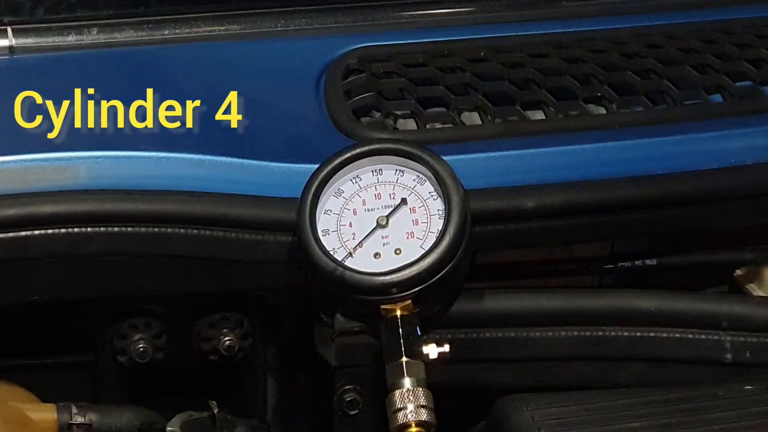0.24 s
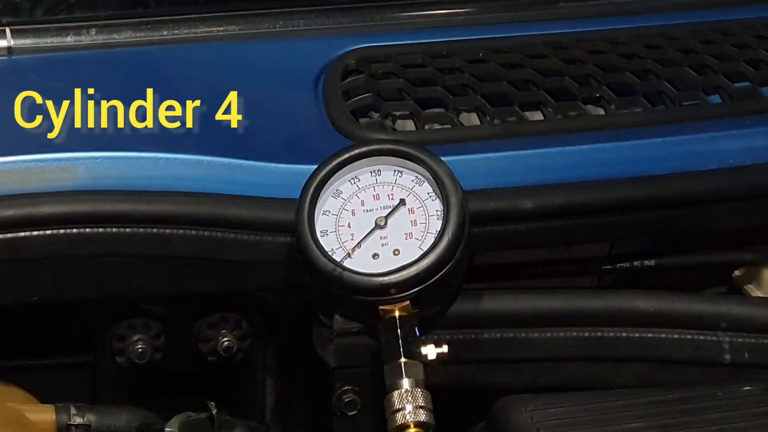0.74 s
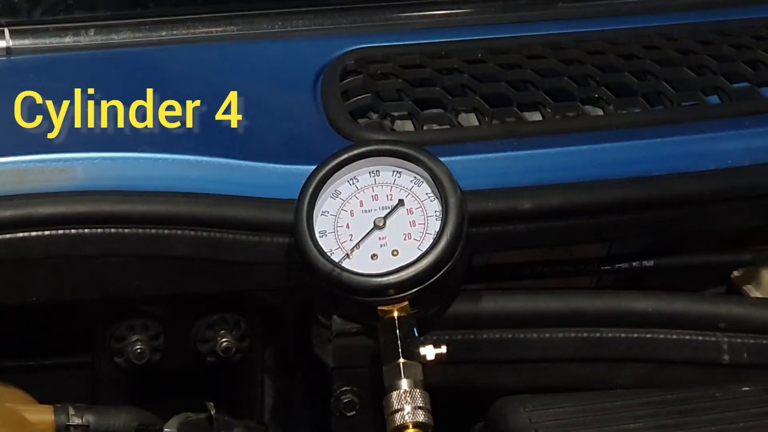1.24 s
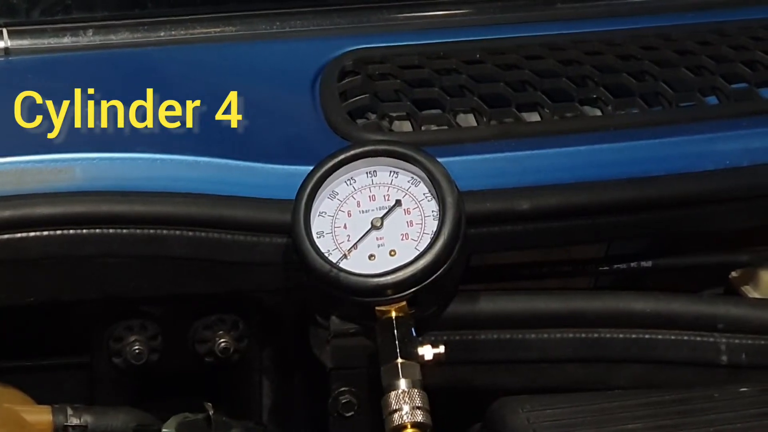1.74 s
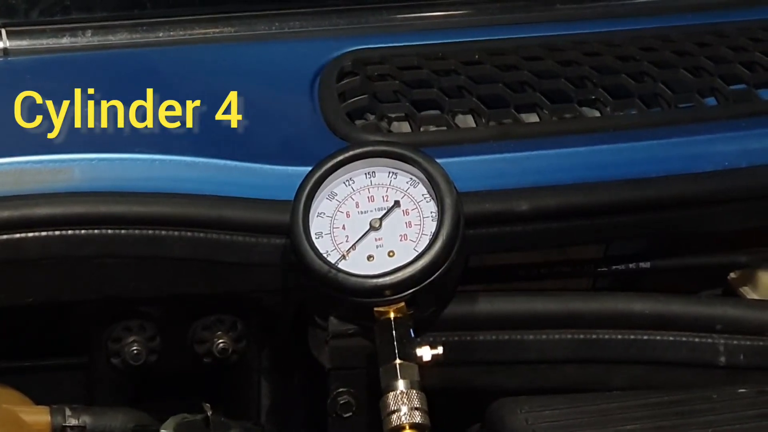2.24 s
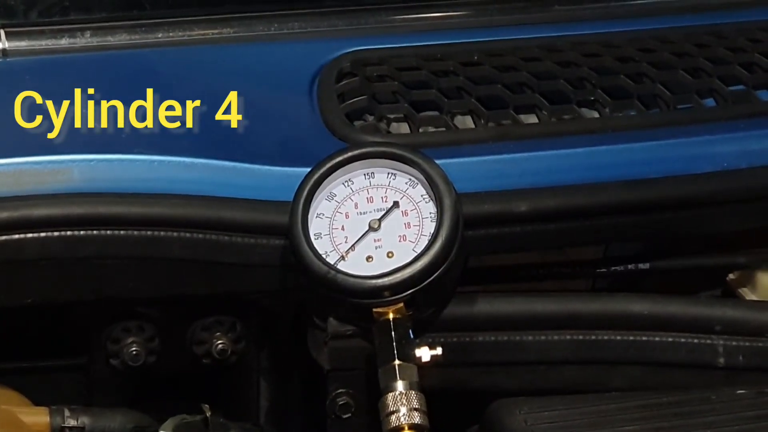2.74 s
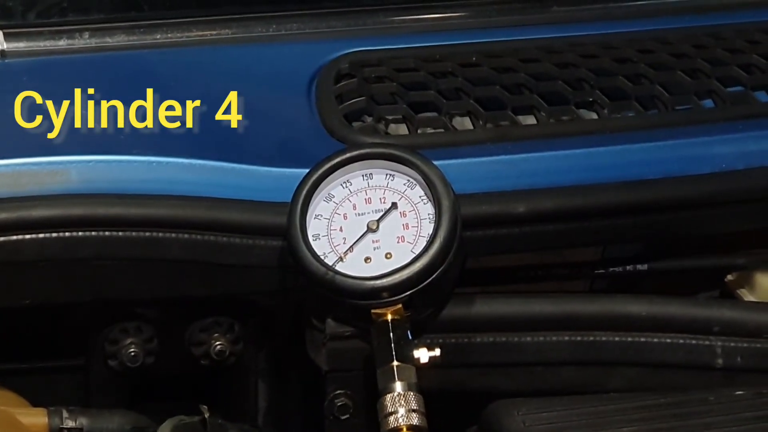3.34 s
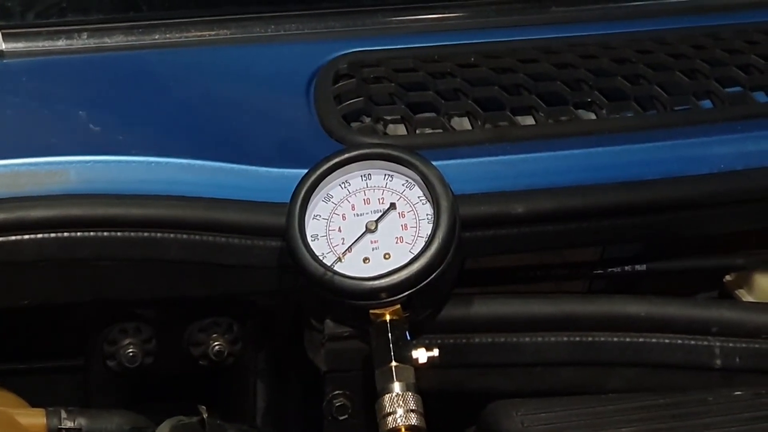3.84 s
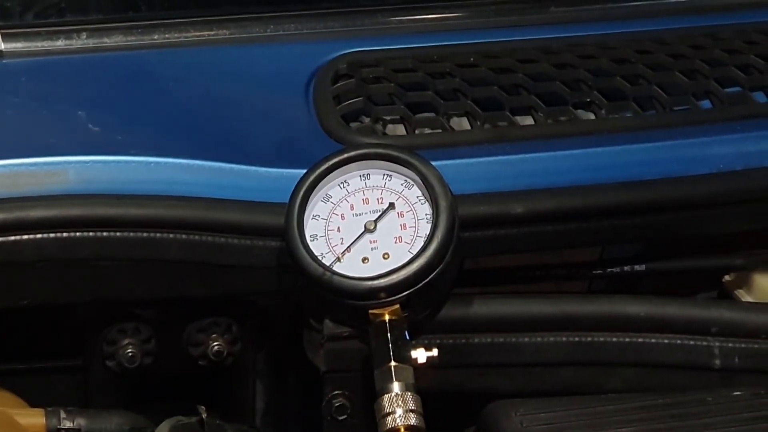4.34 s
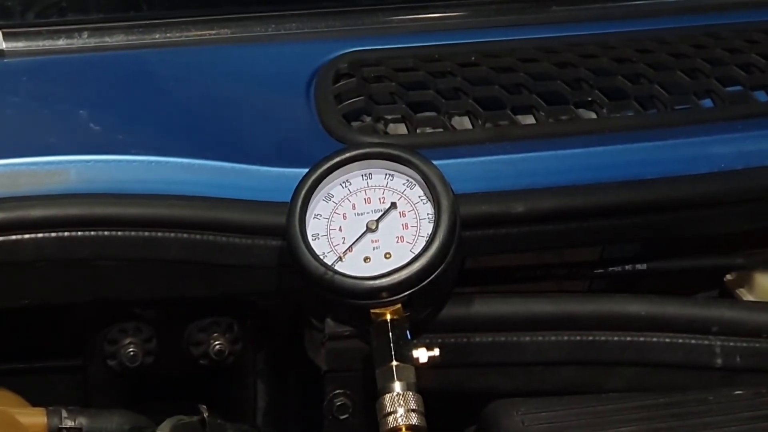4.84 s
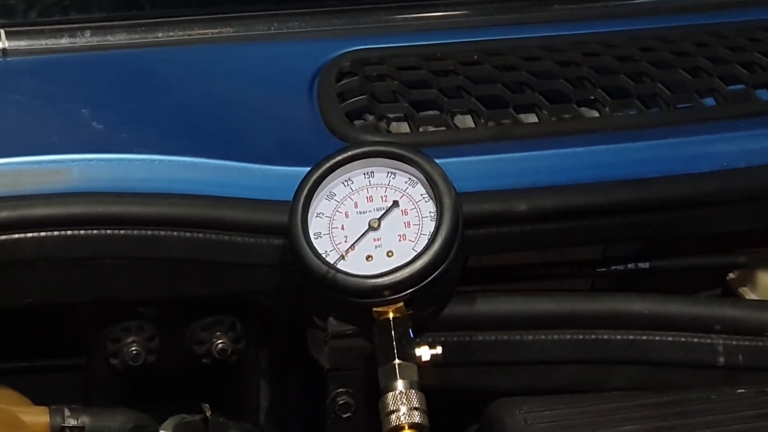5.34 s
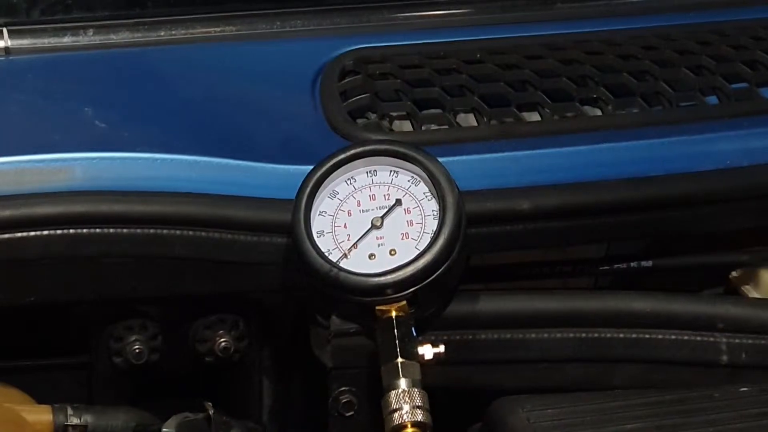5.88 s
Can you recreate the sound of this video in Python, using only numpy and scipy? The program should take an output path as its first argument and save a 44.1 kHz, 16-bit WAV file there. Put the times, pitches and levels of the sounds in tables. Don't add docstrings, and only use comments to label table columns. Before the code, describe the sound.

Low room rumble and a tiny knock, then a sharp solenoid clack and steady, pulsing, rattling starter cranking of an engine that will not catch.

```python
import sys
import numpy as np
from scipy import signal
from scipy.fft import rfft, irfft, next_fast_len
from scipy.io import wavfile

SR = 44100
rng = np.random.default_rng(int(sys.argv[2]) if len(sys.argv) > 2 else 0)


def dump_mix(stems):
    frames = np.atleast_2d(stems).T
    limited = np.clip(frames, -1, 1)
    pcm = np.round(limited * 32767).astype(np.int16)
    wavfile.write(sys.argv[1], SR, pcm)


def linear_from_db(decibels):
    return 10 ** (np.asarray(decibels, float) / 20)


N = 269451
M = next_fast_len(N + 8192)
HZ = np.maximum(np.arange(M // 2 + 1) * SR / M, 1)
T = np.arange(N) / SR
STEADY_FROM_S, STROKE_S = 2.117, 0.1424


def rms_one(x, start_s=0):
    return x / np.sqrt(np.mean(x[..., int(start_s * SR):] ** 2) + 1e-20)


def noise_pair():
    return rng.standard_normal((2, N))


def level(rows_s_db):
    return linear_from_db(np.interp(T, *np.transpose(rows_s_db), -140, -140))


def at_hz(points):
    hz, value = np.transpose(points)
    return np.interp(np.log(HZ), np.log(hz), value)


def colour(x, spectrum):
    below, above = spectrum[0][0] / HZ, HZ / spectrum[-1][0]
    octaves_outside = np.log2(np.maximum(np.maximum(below, above), 1))
    return irfft(rfft(x, M) * linear_from_db(at_hz(spectrum) - 60 * octaves_outside), M)[:, :N]


def highpass(x, order, hz):
    return signal.sosfilt(signal.butter(order, hz, "high", fs=SR, output="sos"), x)


def drift(rate_hz):
    r = np.exp(-80 * np.pi * rate_hz / SR)
    slow = signal.lfilter([1], [1, -2 * r, r * r], rng.standard_normal(N // 40 + 2002))[2000:]
    return np.interp(np.arange(N) / 40, np.arange(len(slow)), rms_one(slow))


def resonate(x, hz, width_hz):
    r = np.exp(-np.pi * width_hz / SR)
    a = [1, -2 * r * np.cos(2 * np.pi * hz / SR), r * r]
    return signal.lfilter([(1 - r * r) / 2, 0, (r * r - 1) / 2], a, x)


def strike(blows, modes, soft_hz):
    at = [round(s * SR) for s, db in blows]
    blow_db = np.array(blows)[:, 1]
    out = np.zeros((2, N))
    for k, (hz, mode_db, t60_s) in enumerate(modes):
        clicks = np.full((2, N), 1e-18)
        clicks[:, at] = linear_from_db(blow_db + mode_db + rng.normal(0, 1, (len(at), 2)).T)
        clicks[1] *= (-1) ** k
        r, w = linear_from_db(-60 / (t60_s * SR)), 2 * np.pi * hz / SR
        out += signal.lfilter([0, np.sin(w)], [1, -2 * r * np.cos(w), r * r], clicks)
    return signal.sosfilt(signal.butter(1, soft_hz, fs=SR, output="sos"), out)


def teeth(per_s, uneven_db, smooth):
    force = linear_from_db(uneven_db * np.minimum(rng.exponential(1, (2, N)), 5))
    force = force * rng.choice([-1, 1], (2, N))
    hits = force * (rng.random((2, N)) < per_s / SR)
    return rms_one(rms_one(hits, 2.3) + smooth * noise_pair())


# time in seconds, level in dB.
RUMBLE_LEVEL = [(0, -44), (.13, -50), (.2, -45), (.32, -46), (.6, -48), (.73, -55), (.82, -48.5),
                (1.2, -52), (1.4, -50), (1.6, -47), (2.3, -49), (3.5, -49), (4.3, -56), (5, -48.5),
                (6.11, -52)]
# frequency in Hz, density in dB per Hz.
RUMBLE_TONE = [(12, -35), (20, -6), (38, -12.5), (60, -5), (79, -6.5), (97, -14.5), (130, -22), (170, -62),
               (290, -120)]


def rumble():
    level_db = np.interp(T, *np.transpose(RUMBLE_LEVEL)) + 2.5 * drift(4.4)
    return rms_one(colour(noise_pair(), RUMBLE_TONE)) * linear_from_db(level_db)


# frequency in Hz, density in dB per Hz.
AIR_TONE = [(65, -35), (110, -6.5), (257, -5), (381, -6), (600, -8.5), (1530, -16), (1900, -19.5),
            (2150, -25), (3900, -31), (4400, -39), (8400, -40), (9000, -51), (11000, -50), (16000, -47)]


def room_air():
    return rms_one(colour(noise_pair(), AIR_TONE)) * linear_from_db(-57.5 + 5.5 * np.exp(-T / 0.3))


# frequency in Hz, density in dB per Hz.
CLICK_TONE = [(1500, 4), (2500, 1), (4000, -8), (5200, 3), (6300, -11), (7400, -8), (9400, -13),
              (10500, -14), (11700, -14), (13000, -18), (16000, -20)]
# time in seconds, level in dB.
CLICK_FADE = [(0, -52), (.02, -58), (.05, -68), (.1, -72), (.2, -79), (.45, -100)]


def click_tail():
    level_db = np.interp(T, *np.transpose(CLICK_FADE), right=-140)
    return rms_one(colour(noise_pair(), CLICK_TONE)) * linear_from_db(level_db)


# start in seconds, level in dB.
KNOCK = [
    (.078, -46),
    (.081, -44),
    (.085, -56),
    (.092, -46),
]
# frequency in Hz, level in dB, t60 in seconds.
CASTING = [(85.5, -11, .15), (134, -6.5, 0.025), (380, -4, 0.085), (515, -5.5, 0.014), (693, -2.5, 0.028),
           (976, -14, 0.043), (1160, -7.5, 0.044), (2890, -9, .04), (3310, -8.5, 0.032)]


def workshop():
    return rumble() + room_air() + click_tail() + strike(KNOCK, CASTING[3:7], soft_hz=3000)


# time in seconds, level in dB.
RELAY = [
    (1.335, -95),
    (1.345, -72),
    (1.366, -68),
    (1.368, -54),
    (1.39, -54),
    (1.41, -63),
    (1.43, -86),
]
# frequency in Hz, density in dB per Hz.
RELAY_TONE = [(1290, -52), (2200, -22), (2660, -2), (4130, -8), (4310, -11), (4680, -5), (9100, -16),
              (11800, -10), (16000, -21)]


def relay():
    return rms_one(colour(noise_pair(), RELAY_TONE)) * level(RELAY)


# time in seconds, level in dB.
SPIN = [
    (1.405, -70),
    (1.410, -56),
    (1.416, -39),
    (1.428, -31),
    (1.434, -21),
    (1.454, -21),
    (1.457, -12.5),
    (1.524, -15.5),
    (1.56, -40),
]
# frequency in Hz, density in dB per Hz.
SPIN_TONE = [(120, -42), (250, -7), (500, 0.5), (800, -11), (1300, -1.5), (2000, -4.5), (2600, -4),
             (3300, -3), (4400, -11), (5700, -11), (7500, -19.5), (12500, -21.5), (16000, -25)]


def free_spin():
    chatter = teeth(1500, uneven_db=-3.0, smooth=1.8)
    return rms_one(colour(chatter, SPIN_TONE)) * level(SPIN) * linear_from_db(-4.0)


# start in seconds, level in dB.
CLACK = [
    (1.4562, -9),
    (1.4585, -1.5),
    (1.471, -10),
]
# frequency in Hz, level in dB, t60 in seconds.
PLUNGER = [(1443, -26, .03), (2030, 7, 0.029), (2510, -6, .03), (3020, -10, 0.042), (3630, -22, .017),
           (5450, 0.5, .012), (7400, -25, .01)]


def solenoid_clack():
    return linear_from_db(-8.5) * strike(CLACK, PLUNGER, soft_hz=9000)


# start in seconds, level in dB.
THUD = [
    (1.481, 0),
    (1.487, -3.5),
    (1.495, -11),
    (1.502, -1.5),
    (1.51, -7),
    (1.519, -4),
]


def pinion_thud():
    return linear_from_db(-7.0) * strike(THUD, CASTING, soft_hz=5000)


def engagement():
    return relay() + free_spin() + solenoid_clack() + pinion_thud()


# time in seconds, pitch as a share, level in dB.
CYCLE_SCATTER = (.012, 0.017, 3.1)


def every_cycle(pattern):
    starts = np.arange(STEADY_FROM_S, N / SR, 4 * STROKE_S)
    rows = np.array([(start + s, hz, db) for start in starts for s, hz, db in pattern])
    luck = rng.standard_normal(rows.shape) * CYCLE_SCATTER
    rows = rows * (1 + luck * [0, 1, 0]) + luck * [1, 0, 1]
    return rows[rows[:, 0] < N / SR]


def singing(moments, length_s, sag):
    out = np.zeros((2, N + SR))
    t = np.arange(-length_s / 2, length_s / 2, 1 / SR)
    phases = rng.random((len(moments), 2)) * 2 * np.pi
    for (s, hz, db), phase in zip(moments, phases):
        at = int((s - length_s / 2) * SR)
        tone = np.sin(2 * np.pi * hz * (t - sag * t * t) + phase[:, None])
        out[:, at:at + len(t)] += linear_from_db(db + 2.5) * np.hanning(len(t)) * tone
    return out[:, :N] * linear_from_db(2.0 * drift(31))


# time into the cycle in seconds, frequency in Hz, level in dB.
BOOMS = [
    (.05, 130, -40.5),
    (.08, 255, -39),
    (.168, 174, -35),
    (.19, 267, -38),
    (.33, 286, -37),
    (.51, 255, -37.5),
]


def intake_booms():
    return singing(every_cycle(BOOMS), length_s=0.076, sag=0.28)


# time into the cycle in seconds, frequency in Hz, level in dB.
SINGS = [(.065, 1210, -28.5), (0.12, 785, -30.5), (.24, 745, -29.5), (.35, 655, -31.5), (0.4, 1150, -30.5),
         (.5, 680, -30), (.49, 1000, -33.5), (.52, 1300, -32), (.35, 505, -34.5)]
# time in seconds, frequency in Hz, level in dB.
SURGES = [(1.704, 124, -35), (1.707, 660, -28), (1.932, 833, -27), (2.062, 1110, -26), (2.322, 1034, -26),
          (2.339, 510, -27), (2.632, 442, -27), (2.912, 974, -25.5), (3.19, 515, -29), (3.473, 1206, -22),
          (3.912, 464, -30.5), (4.147, 976, -31), (4.35, 1196, -32), (4.741, 338, -30), (4.74, 494, -29),
          (5.448, 1080, -22.5), (5.597, 1204, -25), (5.608, 805, -22.5), (6.03, 1300, -28)]


def gear_singing():
    return singing([*every_cycle(SINGS), *SURGES], length_s=0.067, sag=0.37)


# slowest point in seconds, rattle there in dB,
# rattle crest in dB, block crest in dB, breathing in dB.
RUN_UP = [
    (1.528, -28, -24, -23, -49),
    (1.638, -20, -19, -24.5, -41),
    (1.8, -19.5, -18, -22, -46),
    (1.959, -20.5, -17.5, -23.5, -55),
]
# lateness in seconds, rattle at the slowest point in dB,
# block crest in dB, breathing in dB.
CYLINDERS = [
    (0.001, -18, -21, -38),
    (.001, -19, -24, -37.5),
    (-.002, -18.5, -22.7, -43.5),
    (.0, -20, -25, -49),
]


def compressions():
    k = np.arange(int((N / SR - STEADY_FROM_S) / STROKE_S) + 3)
    late_s, slow_db, block_db, breath_db = np.array(CYLINDERS)[k % 4].T
    crest_db = -15.5 - 1.5 * np.exp(-k * STROKE_S / 0.65)
    at_s = STEADY_FROM_S + k * STROKE_S + late_s
    return np.hstack([np.transpose(RUN_UP), [at_s, slow_db, crest_db, block_db, breath_db]])


def per_stroke(turn, column):
    return np.interp(turn, np.arange(len(column)) + .5, column)


# frequency in Hz, width in Hz, level in dB.
INTAKE = [(139, 8.6, 2.5), (175.5, 9.2, 1.5), (97.5, 45, -9), (200, 12, -6)]


def intake_breath(turn, speed, breath_db):
    air = noise_pair()
    breath = rms_one(sum(linear_from_db(db) * resonate(air, hz, w) for hz, w, db in INTAKE))
    level_db = per_stroke(turn + 0.39, breath_db)
    return breath * linear_from_db(level_db + 1.0 * (speed + 0.5) + 1.1 * drift(30))


# frequency in Hz, width in Hz, level in dB for the stroke of cylinders 1, 2, 3, 4.
BLOCK = [(255, 16, -5, -7, -3.5, -1.5), (366, 23, -17, -2, -10, -3), (425, 13, -6, -8, -4, -17),
         (506, 30, -13, -4, -12, 1), (671.4, 18.6, -5, 7.5, -0.5, 3), (788, 134, -10, -6, -3, -4),
         (830, 39, -14, -2, -11, -3), (971, 18, -3, -13, 1.5, -4), (1083, 34, -1, 2.5, -3.5, 4),
         (1193.4, 17, -1.5, 5.5, 3, 10), (1324, 31, -8, -4, -1, 0.5), (1440, 106, -11.5, 0.5, -7.5, -4),
         (1711, 18, -2.5, 1.5, 3, 4.5), (1920, 270, -5.5, -1.5, -5, -1)]
# frequency in Hz, density in dB per Hz.
GROWL = [(200, -31), (270, -6), (490, 0), (700, -1), (910, -5), (1180, 0.5), (1400, -3), (1600, -1),
         (1800, -3), (2200, -20), (2600, -11), (3300, -7)]


def block_growl(turn, speed, block_db):
    swell_db = 3.2 * (np.sin(np.pi * (turn % 1) ** 1.44) ** 0.58 - 1)
    dull = teeth(500 * (.6 + speed), uneven_db=3.5, smooth=1.58)
    dull = dull * linear_from_db(swell_db + per_stroke(turn, block_db) + 0.64 * drift(38))
    cylinder = np.arange(len(block_db)) % 4
    modes = np.zeros((2, N))
    for hz, width_hz, *cylinder_db in BLOCK:
        mode_db = per_stroke(turn, np.array(cylinder_db)[cylinder])
        modes += resonate(dull * linear_from_db(mode_db + 1.2 * drift(3.0)), hz, width_hz)
    return linear_from_db(11.5) * modes + linear_from_db(8.5) * colour(dull * linear_from_db(0.99 * drift(19)), GROWL)


# frequency in Hz, width in Hz, level in dB.
HOUSING = [(2450, 10.7, 3.5), (2725, 30, -1), (2955, 110, 0.5), (3226, 100, -3.5), (3353, 63, 4),
           (3580, 99, -2.5), (3896, 52, -1), (4284, 38, -2), (4630, 68, -6.5), (4790, 19, 2.5),
           (4940, 240, -10.5), (5510, 110, -3.5), (6270, 90, -14), (9560, 82, -25), (11440, 210, -12.5),
           (13000, 130, -21)]
# frequency in Hz, density in dB per Hz.
RATTLE_TONE = [(1300, -31), (2200, -12), (2620, -8.5), (2800, -3.5), (3300, -3), (4100, -5), (5600, -5),
               (6000, -7), (8300, -12.5), (11600, -13), (12800, -15), (13800, -19.5), (15000, -13),
               (16000, -22)]


def gear_rattle(turn, speed, slow_db, crest_db):
    bright = teeth(2500 * (.6 + speed), uneven_db=1.5, smooth=1.48)
    ringing = sum(linear_from_db(db + 3.4 * drift(20.4)) * resonate(bright, hz, w) for hz, w, db in HOUSING)
    rattle = linear_from_db(-1.0) * rms_one(colour(bright, RATTLE_TONE)) + linear_from_db(-5.0) * rms_one(ringing)
    treble = highpass(rattle, 1, 5000)
    rattle = rattle + treble * (linear_from_db(0.5 * (speed - 0.8)) - 1)
    rise_db = speed * (per_stroke(turn, crest_db) - slow_db)
    return rms_one(rattle) * linear_from_db(slow_db + rise_db + 0.33 * drift(31))


def cranking():
    at_s, slow_db, crest_db, block_db, breath_db = compressions()
    turn = np.interp(T, at_s, np.arange(len(at_s)))
    speed = np.sin(np.pi * (turn % 1) ** .95) ** 1.2
    engaged = np.clip((T - 1.5) / 0.022, 0, 1)
    rattle = gear_rattle(turn, speed, np.interp(T, at_s, slow_db), crest_db)
    block = block_growl(turn, speed, block_db)
    return engaged * (rattle + block + intake_breath(turn, speed, breath_db))


# delay in ms, level in dB.
BAY_ECHOES = [(.21, 8), (.55, -7.5), (1.3, -4.5), (2.4, 7.5), (3.9, -4), (6.1, 12)]


def spread(pair, likeness, echoed):
    alike = np.clip(at_hz(likeness), -.995, .995)
    mid, side = rfft(pair, M)
    echoes = 0
    for k, (ms, db) in enumerate(BAY_ECHOES):
        echoes = echoes + linear_from_db(db) * np.exp(-2j * np.pi * HZ * ms / 1000) * (-1) ** k
    echo_side = mid * rms_one(np.abs(echoes)) * np.exp(1j * np.angle(echoes))
    side = np.sqrt(1 - echoed) * side + np.sqrt(echoed) * echo_side
    mid, side = np.sqrt((1 + alike) / 2) * mid, np.sqrt((1 - alike) / 2) * side
    return irfft(np.array([mid + side, mid - side]), M)[:, :N]


def ragged(x, depth_db, width_hz, from_hz):
    knots = rng.standard_normal((2, 600))
    bumps = np.array([np.interp(HZ / width_hz, np.arange(600), row) for row in knots])
    return irfft(rfft(x, M) * linear_from_db(depth_db * bumps / (1 + (from_hz / HZ) ** 4)), M)[:, :N]


def aim(pair, alike_hz, side_db):
    side = linear_from_db(side_db) * highpass(pair[1], 1, alike_hz)
    return pair[0] + side * [[1], [-1]]


# frequency in Hz, width in Hz, share removed.
GAPS = [(1590, 60, .55), (2200, 60, .75), (2650, 60, .85)]


def hollow(x):
    for hz, width_hz, share in GAPS:
        x = x - share * resonate(x, hz, width_hz)
    return x


# frequency in Hz, left-right likeness from -1 to 1.
LIKENESS = [(60, 1), (290, 1), (640, 0.96), (1000, 0.31), (1400, 0.18), (1900, 0.45), (2200, 0.25),
            (2410, 0.39), (2660, -0.19), (3300, -0.23), (3900, -0.039), (4300, 0.16), (4700, 0.05),
            (15000, 0.024)]
# frequency in Hz, left-right likeness from -1 to 1.
SHOP_LIKENESS = [(60, 1), (130, 0.93), (290, 0.78), (640, 0.22), (1410, -0.023), (3100, 0.04), (6820, 0.01),
                 (15000, 0.26)]


def scene():
    shop = spread(workshop(), SHOP_LIKENESS, echoed=0.038)
    turning = cranking() + gear_singing() + intake_booms()
    turning = spread(turning, LIKENESS, echoed=0.23)
    turning = ragged(turning, depth_db=3.0, width_hz=70, from_hz=4540)
    engine = hollow(turning) * (T > 1.49) + aim(engagement(), alike_hz=1500, side_db=0.5)
    return highpass(engine, 3, 75) + shop


def band_limit(x):
    return signal.sosfilt(signal.butter(12, 17020, fs=SR, output="sos"), x)


# frequency in Hz, left minus right in dB.
PORTS = [(300, -0.5), (1300, .5), (2600, 4), (4800, -1), (5500, 0.5), (6000, 6), (8000, 8.5), (8700, 0),
         (9500, -6), (11400, -8), (12300, -4), (13000, 10.5), (15500, -10)]


def record(dry):
    port_gain = linear_from_db(at_hz(PORTS) * [[.5], [-.5]])
    ports = irfft(rfft(dry, M) * port_gain / np.sqrt(1 + (28 / HZ) ** 4), M)[:, :N]
    rounded = .98 * ports / (.98 ** 4 + ports ** 4) ** .25
    top_cut = signal.ellip(14, .5, 85, 15760, fs=SR, output="sos")
    mix = signal.sosfilt(top_cut, rounded)
    return band_limit(mix)


dry = scene()
out = record(dry)
dump_mix(out)
```